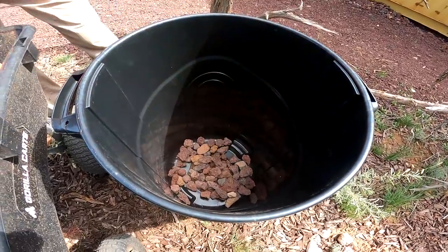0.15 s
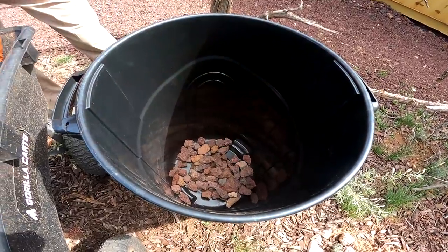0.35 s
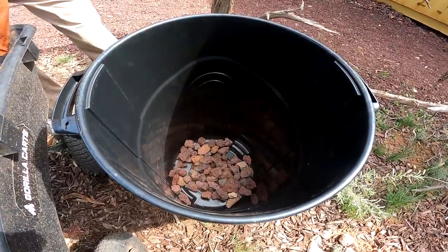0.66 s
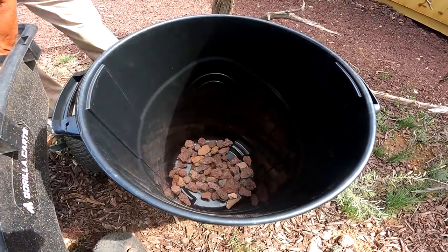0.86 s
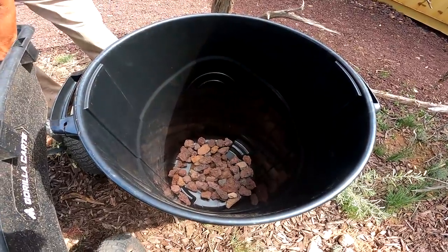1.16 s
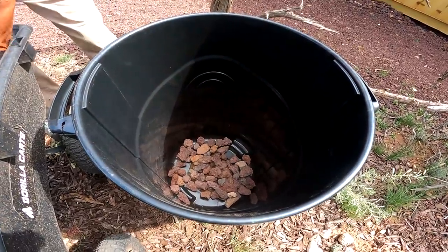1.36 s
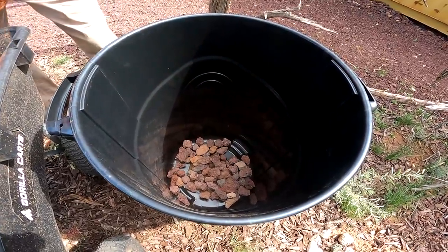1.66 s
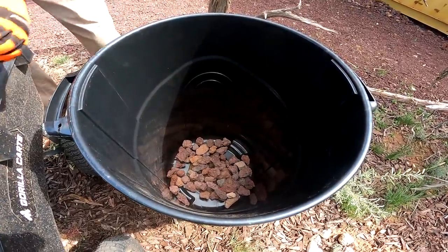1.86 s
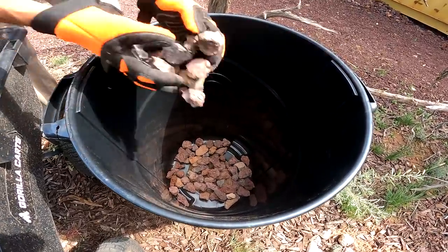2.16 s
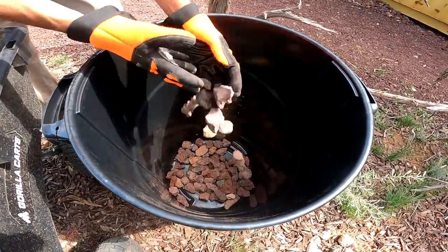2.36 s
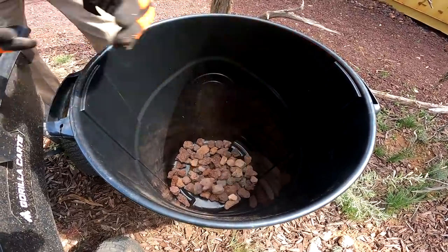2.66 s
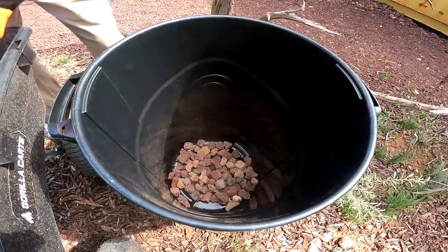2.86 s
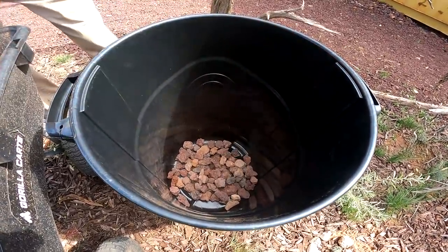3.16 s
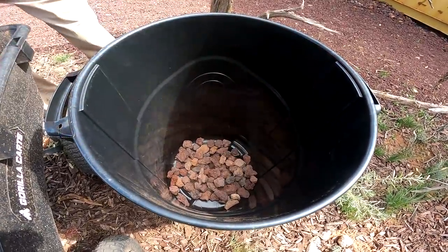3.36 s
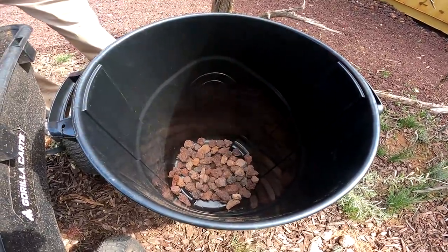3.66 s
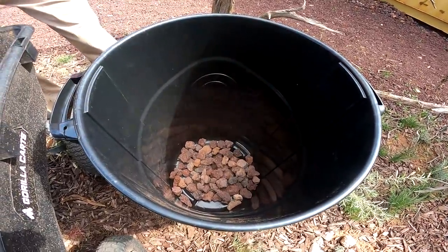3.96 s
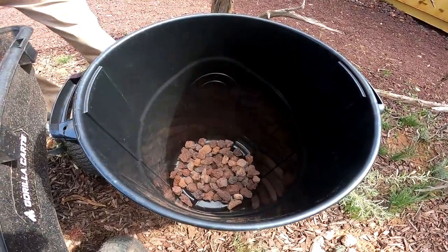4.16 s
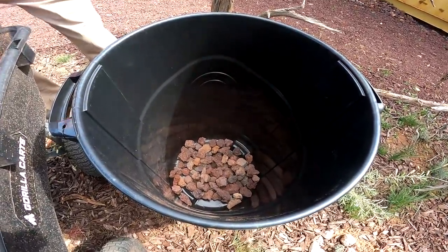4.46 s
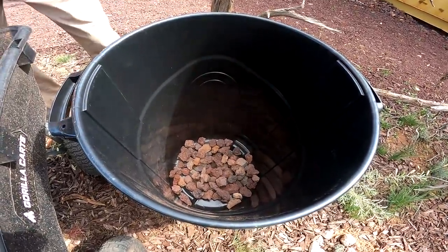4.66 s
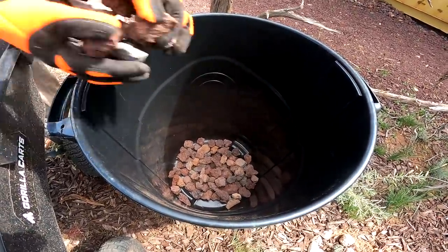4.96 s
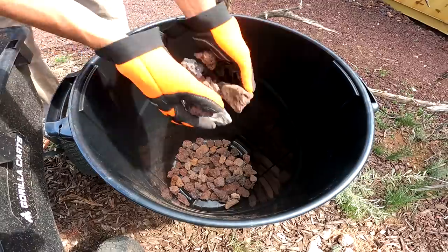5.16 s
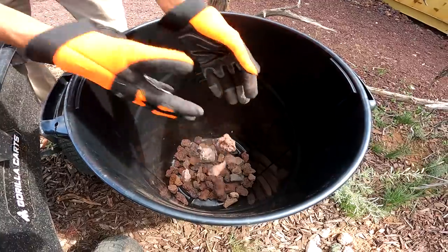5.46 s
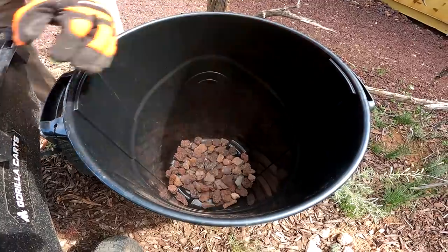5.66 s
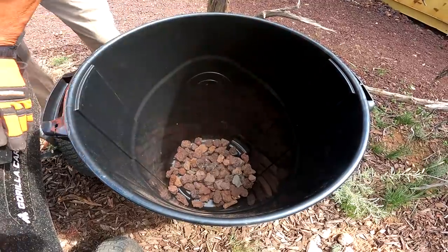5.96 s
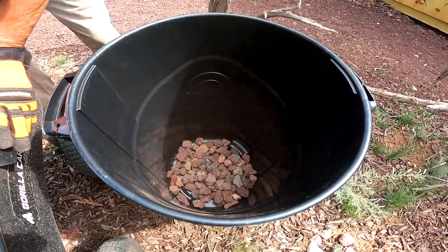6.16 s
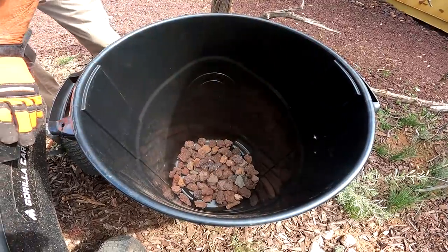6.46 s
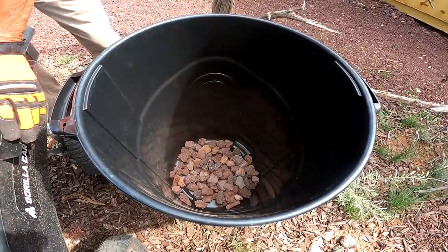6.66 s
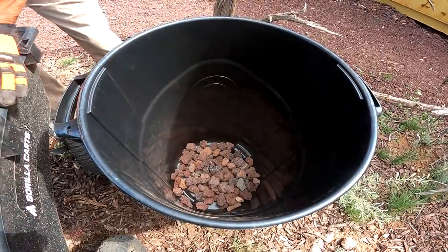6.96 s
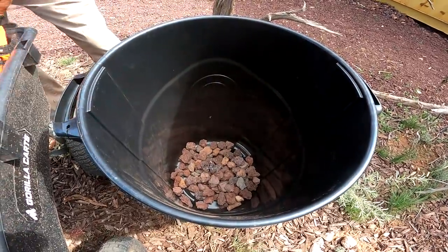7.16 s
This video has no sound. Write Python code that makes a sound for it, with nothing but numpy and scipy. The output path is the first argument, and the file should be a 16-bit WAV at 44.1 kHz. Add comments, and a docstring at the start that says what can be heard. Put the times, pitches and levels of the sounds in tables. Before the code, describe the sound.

Outdoors, close microphone: rocks scrape, clack and drum dully in a plastic cart as hands scoop them. A handful drops into a big plastic can with a sudden loud crack, hollow boom and brief clatter. After a short gap, busier scooping follows, then a second handful crashes in with a lingering low boom. Scooping resumes, with a few thin high pings. Very faint open air underneath.

```python
"""Gloved hands scoop lava rocks from a plastic garden cart: the stones grind, clack and drum on its tub.
Two handfuls drop into a plastic trash can: they crack on the rocks inside and the bottom booms.
A few stones click and rub together, mostly around the can; faint outdoor air lies under it all.
Contacts are filtered noise bursts or pushes heard through bodies of colour, echoes and modes;
hollow notes and pings are gliding sines, two short hoarse swells are band noise."""
import sys
import numpy as np
from scipy import signal
from scipy.fft import rfft, irfft
from scipy.io import wavfile
from scipy.ndimage import uniform_filter1d

SR = 44100
rng = np.random.default_rng(int(sys.argv[2]) if len(sys.argv) > 2 else 0)


def master(y):
    """Save y as 16-bit WAV."""
    cut = np.clip(np.atleast_2d(y).T, -1, 1)
    pcm = np.round(cut * 32767)  # scale
    wavfile.write(sys.argv[1], SR, pcm.astype(np.int16))


N = 322591

# Quiet outdoor air. Each row: frequency in Hz, relative density in dB per Hz.
AIR_SPECTRUM = [(25, -23.5), (100, -1.5), (230, 1.5), (800, -4.5), (2000, -14), (4000, -23), (6000, -28.5),
                (9000, -48), (15000, -55.5)]
AIR_RMS_DB = -49.5
# Thin high pings during the last scoop. Each row: start in seconds, level in dB, ring t60 in seconds.
PING_EVENTS = [(6.562, -23.5, 0.09), (6.669, -33, 0.11), (6.744, -28.5, 0.066), (6.865, -26, 0.11),
               (6.943, -29, 0.065), (7.105, -27, 0.03), (7.183, -33, 0.088), (7.281, -18.5, 0.11)]
# Short hoarse swells, one just before the first crack in the can, one in the cart.
# Each row: start in seconds, length in seconds, strength in dB, pitch in Hz.
HOARSE_SWELLS = [(2.53, 0.029, -27.5, 760), (4.79, 0.064, -24, 860)]
# Rocks landing squarely on bare plastic, which answers with a hollow note or a boom.
# Each row: start in seconds, level in dB, settled pitch in Hz, t60 in seconds.
PLASTIC_TOCKS = [(0.765, -11, 620, 0.05), (1.72, -9.5, 675, 0.04), (2.546, -5.5, 787, 0.027),
                 (2.552, -9.5, 262, 0.06), (2.555, -14, 126, 0.15), (2.672, -13, 120, 0.12),
                 (5.582, -18, 115, 0.22), (5.758, -14, 116, 0.25), (5.76, -13, 463, 0.13),
                 (5.936, -12, 545, 0.065)]

# Stone against stone, clear of the plastic.
# Each row: start in seconds, clack strength in dB, clack pitch in Hz, relative ring strength in dB.
STONE_TICKS = [(1.661, -40.5, 2520, -12), (1.771, -32, 3500, -3), (1.833, -31, 2440, 0.5),
               (1.875, -39, 2870, 2), (2.259, -30, 2000, -25), (2.282, -32.5, 2300, -25),
               (2.308, -30, 2190, -25), (2.327, -36, 2470, -26), (2.373, -31.5, 3300, -25),
               (2.38, -26.5, 2420, -25), (2.439, -22, 2870, -27), (2.461, -22.5, 2600, -28),
               (3.209, -40.5, 2380, -19), (4.513, -25, 3050, -8), (5.215, -36, 1870, -27),
               (5.478, -30.5, 3850, -27), (5.526, -28.5, 2820, -25)]
# Stones rubbing as they slide out of the gloves.
# Each row: start in seconds, length in seconds, strength in dB.
GLOVE_SLIDES = [(2.26, 0.12, -37.5), (2.375, 0.019, -33), (2.52, 0.025, -41.5), (5.22, 0.071, -45.5),
                (5.39, 0.058, -31), (5.48, 0.011, -39)]

# Rocks landing in the can. Each row: time in seconds, strength in dB, hardness 0-1,
# stone pitch in Hz, thud pitch in Hz.
CAN_LANDINGS = [(2.547, -15, 0.91, 3600, 270), (2.55, -19.5, 0.41, 3270, 245), (2.573, -25.5, 1, 3520, 240),
                (2.608, -26.5, 0.85, 3430, 350), (2.634, -24.5, 1.0, 3780, 160),
                (2.658, -28, 0.66, 2800, 450), (2.668, -18.5, 0.52, 3440, 315),
                (2.673, -15.5, 0.67, 3220, 225), (2.708, -22.5, 0.8, 2870, 230),
                (2.722, -19.5, 0.64, 2650, 275), (2.756, -24.5, 1, 2840, 220),
                (2.789, -24.5, 0.41, 2560, 400), (2.797, -20.5, 0.9, 3350, 440), (2.82, -33, 1, 3300, 235),
                (2.829, -20, 1, 2920, 395), (2.836, -35, 1, 3500, 435), (2.851, -16.5, 0.61, 2880, 420),
                (2.967, -28, 0.53, 1730, 590), (3.01, -24, 0.47, 1820, 470),
                (3.026, -33.5, 0.84, 3200, 390), (3.058, -33, 0.42, 1910, 345),
                (5.553, -16, 0.66, 2460, 520), (5.564, -13.5, 0.57, 2640, 545),
                (5.571, -18, 0.57, 2850, 460), (5.619, -15, 0.72, 2600, 385), (5.644, -41, 0.7, 3630, 205),
                (5.658, -24, 1, 2920, 255), (5.667, -19.5, 0.9, 3200, 335), (5.682, -29, 0.7, 2600, 270),
                (5.688, -19, 0.94, 3100, 340), (5.701, -19, 0.59, 2700, 470), (5.712, -20.5, 1, 3440, 225),
                (5.749, -28.5, 1, 2420, 410), (5.759, -15.5, 0.36, 2400, 370),
                (5.801, -28, 0.88, 3870, 435), (5.823, -28.5, 0.57, 2550, 250),
                (5.884, -23.5, 0.63, 2660, 515), (5.935, -18.5, 0.44, 2130, 400),
                (6.022, -31, 0.35, 2840, 530), (6.068, -33.5, 0.5, 1930, 500)]
# The bed of rocks shaking under each handful.
# Each row: start in seconds, length in seconds, strength in dB, depth in dB.
CAN_POURS = [(2.555, 0.053, -26.5, 0), (2.63, 0.14, -23.5, 0.5), (2.77, 0.1, -25.5, -2.5),
             (5.57, 0.19, -37, 9.5), (5.665, 0.046, -24.5, 3.5), (5.75, 0.0096, -29, 7),
             (5.92, 0.059, -35, 2.5), (6.04, 0.27, -40, -3)]

# Rocks knocking in the tub; hardness 0 = flat on the plastic, 1 = on other stones only.
# Each row: time in seconds, strength in dB, hardness 0-1, stone pitch in Hz, thud pitch in Hz.
TUB_KNOCKS = [(0.061, -26, 0.77, 2300, 325), (0.071, -24, 0.39, 2180, 325), (0.132, -20.5, 0.38, 1930, 254),
              (0.168, -25.5, 0.42, 1990, 322), (0.199, -36, 0.2, 2550, 315), (0.38, -21.5, 0.42, 1980, 325),
              (0.396, -27.5, 0.9, 2580, 305), (0.411, -27.5, 0.4, 2090, 240), (0.436, -22, 0.87, 1800, 347),
              (0.488, -20.5, 0.48, 1920, 345), (0.512, -24, 0.35, 2110, 306), (0.572, -23, 0.58, 2080, 360),
              (0.763, -19.5, 0.56, 1690, 353), (0.854, -24.5, 0.63, 2180, 274),
              (0.902, -26.5, 0.4, 2910, 296), (0.981, -28.5, 0.27, 2230, 450),
              (0.992, -20, 0.52, 2040, 392), (1.059, -30.5, 0.65, 2630, 300),
              (1.174, -29.5, 0.61, 2260, 407), (1.271, -27.5, 0.45, 1970, 400),
              (1.301, -32.5, 1, 2950, 405), (1.341, -24.5, 0.45, 1860, 420),
              (1.392, -33.5, 0.55, 3000, 340), (1.589, -28.5, 0.4, 1870, 344),
              (1.627, -28.5, 0.43, 1710, 310), (1.699, -18, 0.68, 1720, 413),
              (1.719, -25.5, 0.62, 1700, 517), (1.808, -32.5, 0.53, 2730, 291),
              (1.849, -26, 0.67, 1700, 315), (1.914, -33, 0.62, 2050, 298), (1.953, -32, 0.63, 1780, 297),
              (2.148, -44, 0.47, 2400, 290), (3.317, -20, 0.47, 1820, 324), (3.368, -25, 0.34, 1870, 318),
              (3.474, -19, 0.46, 1960, 290), (3.546, -22.5, 0.7, 2470, 320),
              (3.579, -17.5, 0.52, 1870, 228), (3.603, -21.5, 0.3, 2140, 192),
              (3.625, -21.5, 0.4, 1930, 214), (3.675, -19.5, 0.55, 2900, 258), (3.703, -28, 0.8, 2850, 265),
              (3.728, -27, 0.2, 2360, 227), (3.791, -23, 0.47, 2330, 262), (3.898, -19.5, 0.54, 2130, 363),
              (3.916, -16.5, 0.43, 2000, 245), (3.955, -20.5, 0.42, 1910, 380),
              (4.03, -23, 0.38, 2200, 283), (4.068, -27, 0.27, 2050, 396), (4.111, -23, 0.6, 2640, 327),
              (4.189, -30.5, 0.19, 2250, 400), (4.378, -26, 0.39, 2320, 308),
              (4.433, -28.5, 0.45, 2380, 308), (4.512, -23, 0.74, 2510, 310),
              (4.549, -24.5, 0.6, 1870, 270), (4.585, -20.5, 0.43, 2350, 237),
              (4.627, -26, 0.37, 2170, 204), (4.711, -17.5, 0.42, 2430, 242),
              (4.767, -23.5, 0.61, 1910, 295), (4.801, -29, 0.48, 1890, 302),
              (4.814, -26.5, 0.58, 1900, 410), (4.868, -16, 0.44, 2610, 260),
              (4.886, -21.5, 0.68, 2500, 298), (4.898, -21, 0.25, 2080, 295), (4.928, -25, 0.54, 2100, 304),
              (4.957, -28, 0.46, 2050, 434), (5.091, -32.5, 0.5, 2000, 363), (5.12, -25.5, 0.55, 1800, 376),
              (5.178, -36.0, 0.43, 2050, 425), (5.276, -30.5, 0.45, 1910, 410),
              (6.227, -25.5, 0.59, 2180, 510), (6.589, -24.5, 0.2, 2250, 224), (6.655, -29, 0.1, 2140, 340),
              (6.75, -20, 0.44, 1920, 232), (6.788, -25.5, 0, 2040, 198), (6.919, -21, 0.61, 2380, 290),
              (6.971, -26, 0.36, 2270, 352), (7.024, -20.5, 0.56, 2200, 285), (7.058, -21, 0.38, 1940, 267),
              (7.108, -24.5, 0.37, 3160, 320), (7.144, -17.5, 0.4, 2480, 232), (7.22, -18, 0.5, 2980, 330),
              (7.276, -18, 0.37, 2520, 358)]
# Pushes of the hands through the heap; deep ones drum more on the tub.
# Each row: start in seconds, length in seconds, strength in dB, depth in dB.
TUB_SCOOPS = [(0.0, 0.21, -36, 0), (0.19, 0.041, -27, 3), (0.29, 0.15, -31.5, 7.5), (0.43, 0.065, -29.5, 5),
              (0.63, 0.052, -41.5, 5), (0.84, 0.074, -30, 2.5), (0.98, 0.042, -34.5, 2),
              (1.06, 0.11, -39, 1.5), (1.3, 0.064, -37, 2), (1.48, 0.018, -43.5, 0.5),
              (1.84, 0.085, -48.5, -6), (3.33, 0.19, -33, 5), (3.51, 0.097, -26.5, 4),
              (3.6, 0.13, -25.5, 1.5), (3.79, 0.28, -29.5, 2.5), (4.12, 0.036, -31, 0.5),
              (4.228, 0.017, -30, 1.5), (4.33, 0.052, -43, 2), (4.47, 0.023, -38.5, 6.5),
              (4.61, 0.14, -35.5, 7), (4.72, 0.079, -34.5, 3), (4.87, 0.038, -35, 7.5),
              (5.14, 0.015, -41.5, -1.5), (5.3, 0.022, -42.5, -6.5), (6.12, 0.08, -57, 6.5),
              (6.25, .02, -44, -7), (6.33, 0.17, -32.5, -7.5), (6.45, 0.19, -27.5, 4),
              (6.57, 0.24, -29, 7.5), (6.78, 0.2, -27, 6.5), (7.02, 0.046, -31, 3), (7.15, 0.36, -36, 8)]

# Colour of stone ticks and of blows in the can and the tub. Each row: frequency in Hz, gain in dB.
STONE_GAINS = [(300, 6.5), (1000, 6.5), (2500, 3), (4500, -3.5), (6500, -13), (10000, -22.5), (15000, -20)]
CAN_GAINS = [(60, -17.5), (110, -6), (200, -3.5), (450, 14), (900, 9), (1500, 9), (3000, 8), (4500, 2.5),
             (6500, -9.5), (10000, -14.5), (15000, -9.5)]
TUB_GAINS = [(60, -6), (110, -11.5), (170, 7), (300, 7), (450, 3), (800, 7.5), (1500, -4.5), (3000, -14.5),
             (4500, -19), (6500, -24.5), (10000, -32), (15000, -25)]
# Ringing of the plastic. Each row: frequency in Hz before detuning, level in dB before a random share,
# t60 in seconds.
CAN_RINGS = [(113.5, -34, 0.13), (138, -36, 0.12), (175, -29, 0.036), (273, -38.5, 0.076),
             (459.5, -40.5, 0.096), (785, -34, 0.022)]
TUB_RINGS = [(167.7, -37, 0.045), (209.6, -36, 0.053), (284, -45, 0.1), (325.6, -42, 0.078),
             (423.7, -39.5, 0.073), (461.6, -33, 0.058)]
# Sound bouncing between the walls. Each row: frequency in Hz, t60 in seconds.
CAN_ECHO_T60 = [(150, 0.41), (500, 0.11), (1500, 0.076), (3000, 0.059), (6000, 0.063)]
TUB_ECHO_T60 = [(150, 0.1), (500, 0.16), (1500, 0.052), (3000, 0.046), (6000, 0.029)]

# Bands of the plastic's thud, the knock of the contact and the stone's clack: low, high.
THUD_HZ, KNOCK_HZ, CLACK_HZ = (70, 600), (600, 1500), (1500, 12000)
# Drop of a layer (thud at hardness 0, knock at 0.5, clack at 1) at the other end of the scale.
MISMATCH_DB = 46
BAND_LIMIT_HZ = 16200


def amp(db):
    """Decibels to gain."""
    return 10 ** (np.asarray(db) / 20)


def read(points, hz):
    """Interpolates a table linearly over log frequency."""
    point_hz, value = np.transpose(points)
    return np.interp(np.log(hz + 1), np.log(point_hz), value)


def add(mix, start_s, sound):
    """Mixes a sound in at start_s."""
    part = mix[max(round(start_s * SR), 0):][:len(sound)]
    part += sound[:len(part)]


def bandpass(x, band_hz):
    """Butterworth band-pass."""
    return signal.sosfilt(signal.butter(2, band_hz, "bandpass", fs=SR, output="sos"), x)


def causal(db):
    """Minimum-phase frequency response with the given gains."""
    log_gain = np.log(amp(np.concatenate([db, db[-2:0:-1]])))
    return np.exp(np.conj(signal.hilbert(log_gain)))[:len(db)]


def air():
    """Faint steady outdoor noise, shaped in frequency."""
    gain = amp(read(AIR_SPECTRUM, np.fft.rfftfreq(N, 1 / SR)))
    noise = irfft(rfft(rng.standard_normal(N)) * gain, N)
    return amp(AIR_RMS_DB) * noise / noise.std()


def yard(x, wet_db=-24, fade_s=0.088):
    """Scattered echoes from the ground and things nearby: a decaying noise tail."""
    t = np.arange(SR // 2) / SR
    tail = rng.standard_normal(len(t)) * np.exp(-t / fade_s) * np.minimum(t / 0.018, 1)
    return x + amp(wet_db) * signal.oaconvolve(x, tail / np.linalg.norm(tail))[:N]


def body(colour, decay, modes, echo_db, swell_s, size=8192):
    """What surrounds a blow: its colour, the swelling and dying of its wall echoes, its modes."""
    t, hz = np.arange(size) / SR, np.fft.rfftfreq(size, 1 / SR)
    frame_hz, frame_s, _ = signal.stft(t, SR, nperseg=128)
    fade = amp(-60 * frame_s / read(decay, frame_hz)[:, None])
    rings = [(mode_hz, amp(db - 60 * t / t60_s)) for mode_hz, db, t60_s in modes]
    swell = np.clip(t / swell_s, 0, 1) ** 2
    return dict(t=t, hz=hz, colour=causal(read(colour, hz)), fade=fade, swell=swell,
                rings=rings, echo=amp(echo_db))


def response(place, band_hz, detune=0.049):
    """One spot in a body: direct sound, dense echoes, and modes retuned by the rocks loading it."""
    t, rings = place["t"], place["rings"]
    spectra = signal.stft(rng.standard_normal(len(t)), nperseg=128)[2] * place["fade"]
    echoes = signal.istft(spectra)[1][:len(t)] * place["swell"]
    out = place["echo"] * echoes / np.linalg.norm(echoes)
    draws = rng.uniform(-1.166, 1, (len(rings), 2))
    for (mode_hz, dying), (share, shift) in zip(rings, draws):
        if band_hz != CLACK_HZ:
            out += share * dying * np.sin(2 * np.pi * mode_hz * (1 + detune * shift) * t)
    out[0] += 1  # direct sound
    return rfft(out) * place["colour"]


def crush(place, crush_s):
    """Rough faces touch many times within milliseconds, so the force swells before it dies."""
    age = place["t"] / crush_s
    return rfft(rng.standard_normal(len(age)) * age * np.exp(-age ** 1.5))


def blow(place, band_hz, hz, spread_octaves, force=1):
    """A force (default one clean push) rings a broad resonance, heard through the body."""
    octaves = np.log2((place["hz"] + 1) / hz)
    resonance = causal(np.maximum(-3 * (octaves / spread_octaves) ** 2, -60))
    out = bandpass(irfft(force * resonance * response(place, band_hz)), band_hz)
    return out / np.sqrt(np.mean(out[:SR // 50] ** 2))  # unit rms over the first 20 ms


def quieter_walls(place, walls_db):
    """The same body with its echo level changed by walls_db."""
    return dict(place, echo=place["echo"] * amp(walls_db))


def thud(place, hz, walls_db=-4):
    """The plastic floor gives way at one push, too low for the walls to throw much back."""
    return blow(quieter_walls(place, walls_db), THUD_HZ, hz, spread_octaves=0.5)


def knock(place, hz=713, crush_s=0.0016):
    """The hard contact itself: a crunching force on a very broad resonance."""
    return blow(place, KNOCK_HZ, hz, spread_octaves=0.99, force=crush(place, crush_s))


def clack(place, hz, crush_s, spread_octaves=0.65):
    """A porous stone is heavily damped, so its note is broad."""
    return blow(place, CLACK_HZ, hz, spread_octaves, force=crush(place, crush_s))


def hits(rows, place, thud_db, knock_db, clack_db, walls_db, spread_octaves, early_s=0.0007):
    """Single rocks atop the heap: soft blows mostly thud, middling ones knock, hard ones clack."""
    out, top = np.zeros(N), quieter_walls(place, walls_db)
    for time_s, db, hardness, stone_hz, thud_hz in rows:
        low_db, middle_db, high_db = db - MISMATCH_DB * (hardness - np.array([0, 0.5, 1])) ** 2
        sound = amp(low_db + thud_db) * thud(place, thud_hz)
        sound += amp(middle_db + knock_db) * knock(top, np.sqrt(stone_hz * thud_hz))
        crush_s = 0.0019 * 2 ** rng.uniform(-0.56, 0.54)  # flat faces snap, rough ones crunch
        sound += amp(high_db + clack_db) * clack(top, stone_hz, crush_s, spread_octaves)
        add(out, time_s - early_s, sound)
    return out


def effort(rows, rise_db_per_s, fall_db_per_s, depth_share=0):
    """Gain over time: each movement swells, holds and dies away; the strongest one leads."""
    t, level_db = np.arange(0, N, 64) / SR, -200
    for start_s, length_s, db, *depth_db in rows:
        before_s = np.maximum(start_s - t, 0)
        after_s = np.maximum(t - start_s - length_s, 0)
        away_db = rise_db_per_s * before_s + fall_db_per_s * after_s
        level_db = np.maximum(level_db, db + depth_share * sum(depth_db) - away_db)
    return np.interp(np.arange(N) / SR, t, amp(level_db))


def collisions(per_s, scatter_db, count=24, size=24000):
    """Random uneven impacts at a steady or changing rate: one click train a stone."""
    trains = np.zeros((count, N))
    chance, luck, sign, moment, stone = rng.random((size, 5)).T
    at = (moment * N).astype(int)
    happens = chance < (per_s * np.ones(N))[at] * N / SR / size
    force = amp(scatter_db * np.minimum(-np.log(luck), 3)) * np.sign(sign - 0.5)
    trains[(stone * count).astype(int), at] = force * happens
    return trains


def tumble(gain, trains, grains):
    """Each stone sounds at its impacts; together they follow the gain."""
    out = sum(signal.oaconvolve(train, grain[:8192])[:N] for train, grain in zip(trains, grains))
    power = uniform_filter1d(uniform_filter1d(out ** 2, size=2800), size=2800)
    return out / np.sqrt(abs(power) + 1e-9) * gain


def pebbles(place, hz, variety, crush_s=0.0011, count=24):
    """Clacks of stones of many sizes, the largest first."""
    return [clack(place, hz * np.exp(variety * u), crush_s) for u in np.linspace(-1, 1, count)]


def heap(moves, place, rise_db_per_s, fall_db_per_s, stone_hz, per_s, scatter_db, contact_s,
         thud_db, knock_db, clack_db, calm=0.15, knock_share=0.23, floor_hz=250,
         size_octaves=1.0, thuds_per_s=340):
    """A moving heap: contacts rasp, the larger stones also knock, and some drum on the plastic."""
    stir, press, drum = (effort(moves, rise_db_per_s, fall_db_per_s, share)
                         for share in (0, knock_share, 1))
    # harder stirring moves more stones, until single ticks fuse into a scrape
    trains = collisions(per_s * (calm + stir / stir.max()), scatter_db)
    floor = [thud(place, floor_hz * 2 ** (size_octaves * u)) for u in np.linspace(-1, 1, num=14)]
    thuds = tumble(drum, collisions(thuds_per_s, scatter_db=4.5, count=len(floor)), floor)
    knocks = tumble(press, trains, [knock(place, crush_s=contact_s) for _ in trains[:18]])
    clacks = tumble(stir, trains, pebbles(place, stone_hz, variety=0.28, crush_s=contact_s))
    return amp(thud_db) * thuds + amp(knock_db) * knocks + amp(clack_db) * clacks


def pings(hz=5480, flat=0.027, settle_s=0.0067, rasp=0.24):
    """Starts abruptly, rough and a little flat, settles into a pure ring half as strong, echoes."""
    out, t = np.zeros(N), np.arange(SR // 5) / SR
    start = np.exp(-(t / settle_s) ** 2)
    for start_s, db, t60_s in PING_EVENTS:
        waver = uniform_filter1d(rng.standard_normal(len(t)), size=40)
        turns = np.cumsum(hz * (1 + start * (rasp * waver - flat))) / SR
        level = np.minimum(t / 0.002, 1) * (start + amp(-60 * t / t60_s)) / 2
        add(out, start_s, amp(db) * level * np.sin(2 * np.pi * turns))
    return yard(out, wet_db=-6, fade_s=0.1)


def hoarse_swells(width_octaves=0.36):
    """Short hoarse bursts of narrow-band noise that swell and fade."""
    out = np.zeros(N)
    for start_s, length_s, db, hz in HOARSE_SWELLS:
        edges_hz = hz * 2 ** (width_octaves * np.array([-0.5, 0.5]))
        noise = bandpass(rng.standard_normal(SR // 10), edges_hz)
        swell = np.sin(np.pi * np.minimum(np.arange(len(noise)) / SR / length_s, 1))
        add(out, start_s, amp(db) * swell * noise / noise.std())
    return out


def tocks(sharp=0.17, relax_s=0.003):
    """Dented plastic is stiffer at first: a note swells over one cycle, starts sharp and sinks."""
    out, t = np.zeros(N), np.arange(SR // 2) / SR
    for start_s, db, hz, t60_s in PLASTIC_TOCKS:
        turns = np.cumsum(hz * (1 + sharp * np.exp(-t / relax_s))) / SR
        level = np.minimum(turns, 1) * amp(db - 60 * t / t60_s)
        add(out, start_s, level * np.sin(2 * np.pi * turns))
    return out


def loose_stones(ring_s=0.014):
    """Stones tick and rub, mostly around the can, each tick with a short swelling echo; some ring briefly."""
    near = body(STONE_GAINS, CAN_ECHO_T60, [], echo_db=-1.5, swell_s=0.0033)
    rubbing = collisions(per_s=4000, scatter_db=7)
    sliding = effort(GLOVE_SLIDES, rise_db_per_s=187.5, fall_db_per_s=345)
    out = amp(-2.5) * tumble(sliding, rubbing, pebbles(near, 2600, variety=0.46))
    for start_s, db, hz, ring_db in STONE_TICKS:
        ring = np.exp(-near["t"] / ring_s) * np.sin(2 * np.pi * hz * near["t"])
        tick = clack(near, hz, crush_s=0.00061, spread_octaves=0.66)
        add(out, start_s, amp(db) * (tick + amp(-17.5) * knock(near) + 2 * amp(ring_db) * ring))
    return out


def trash_can():
    """Handfuls land on the rocks at the bottom of the deep can: single hits over a shaking bed."""
    can = body(CAN_GAINS, CAN_ECHO_T60, CAN_RINGS, echo_db=-2.5, swell_s=0.0017, size=12288)
    settling = heap(CAN_POURS, can, rise_db_per_s=708, fall_db_per_s=105, stone_hz=2850, per_s=600,
                    scatter_db=5.0, contact_s=0.0011, thud_db=1.0, knock_db=0.0, clack_db=-6.5,
                    floor_hz=186)
    landings = hits(CAN_LANDINGS, can, thud_db=9.0, knock_db=-3.5, clack_db=4.5, walls_db=-3,
                    spread_octaves=0.61)
    return settling + landings


def cart(full_db=-5, emptier_db=1, boom_hz=190):
    """Scooping from the open, shallow tub; its floor booms more freely as the load gets lighter."""
    tub = body(TUB_GAINS, TUB_ECHO_T60, TUB_RINGS, echo_db=-6.0, swell_s=0.0026)
    grinding = heap(TUB_SCOOPS, tub, rise_db_per_s=514.0, fall_db_per_s=136, stone_hz=2290,
                    per_s=1400, scatter_db=5.5, contact_s=0.0023, thud_db=5.5, knock_db=-1.0,
                    clack_db=1.6)
    knocking = hits(TUB_KNOCKS, tub, thud_db=12.5, knock_db=-4.5, clack_db=4.5, walls_db=-1.5,
                    spread_octaves=0.62)
    out = grinding + knocking
    boom = signal.sosfiltfilt(signal.butter(2, boom_hz, fs=SR, output="sos"), out)
    boom_db = np.interp(np.arange(N) / SR, [1.5, 4], [full_db, emptier_db])
    return out + (amp(boom_db) - 1) * boom


def scene():
    """Cart, loose stones and can in the open yard."""
    sources = cart() + loose_stones() + trash_can() + tocks() + hoarse_swells() + pings()
    return (yard(sources) + air())[None]


def record(dry):
    """The hardest cracks overload the recorder and are rounded off; then the band limit."""
    clipped = dry / (1 + dry ** 8) ** (1 / 8)
    low_pass = signal.firwin(255, BAND_LIMIT_HZ, window=("kaiser", 9), fs=SR)
    return signal.oaconvolve(clipped, low_pass[None], "same")


dry = scene()
out = record(dry)
master(out)
```